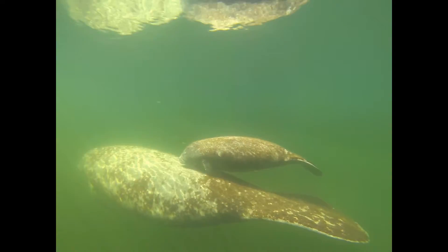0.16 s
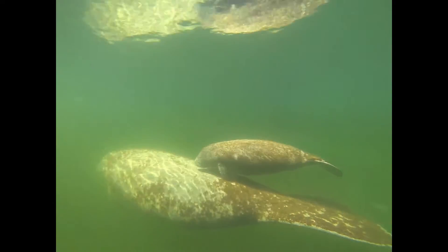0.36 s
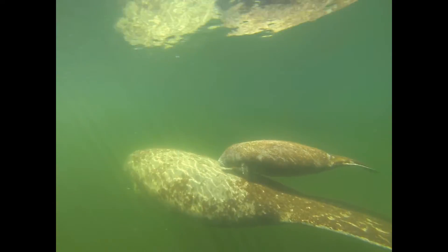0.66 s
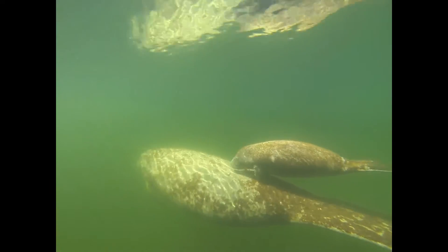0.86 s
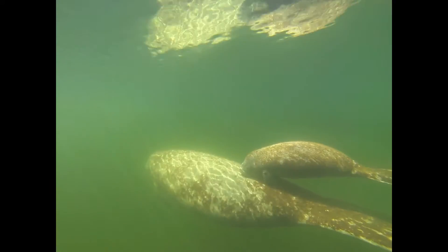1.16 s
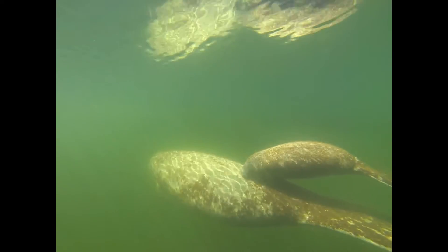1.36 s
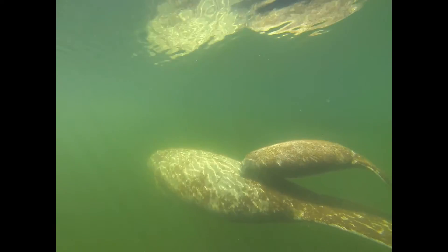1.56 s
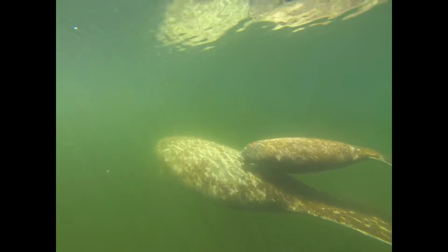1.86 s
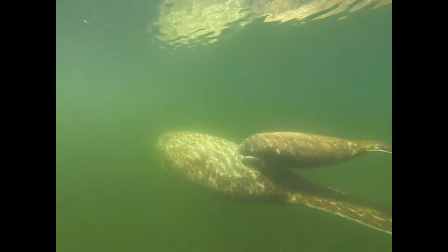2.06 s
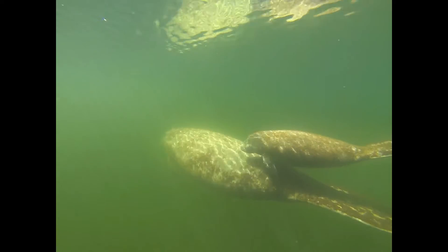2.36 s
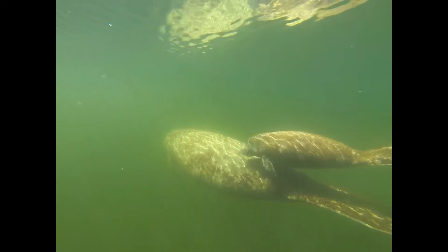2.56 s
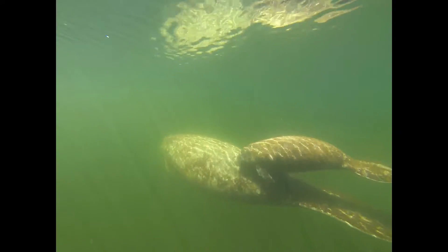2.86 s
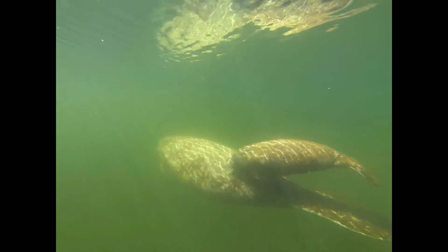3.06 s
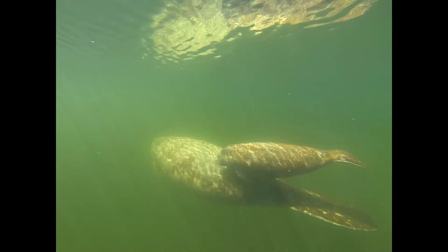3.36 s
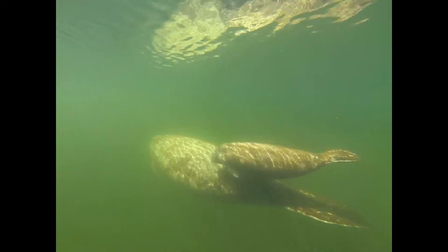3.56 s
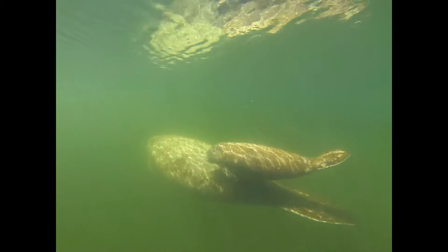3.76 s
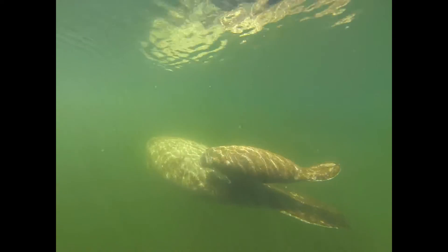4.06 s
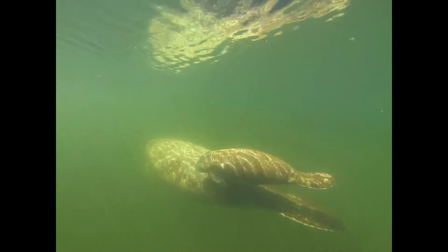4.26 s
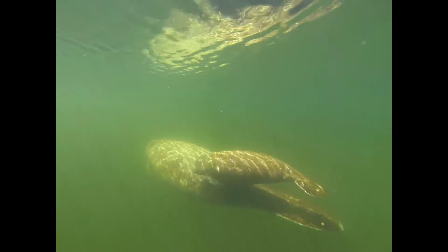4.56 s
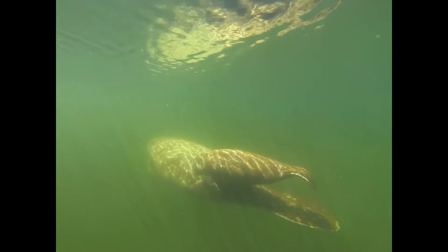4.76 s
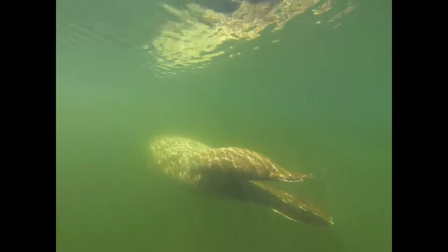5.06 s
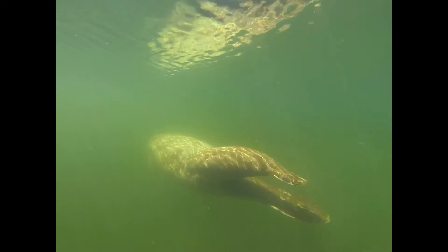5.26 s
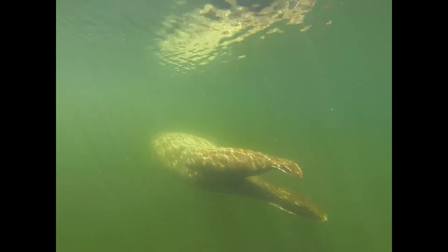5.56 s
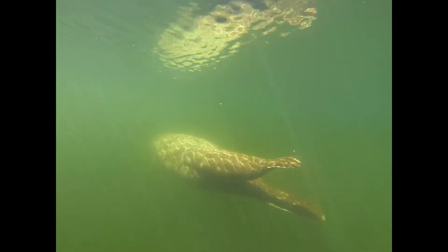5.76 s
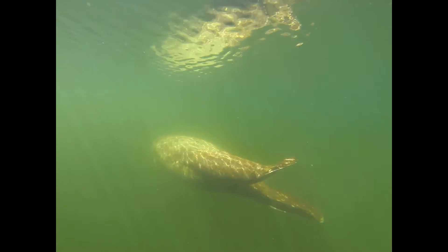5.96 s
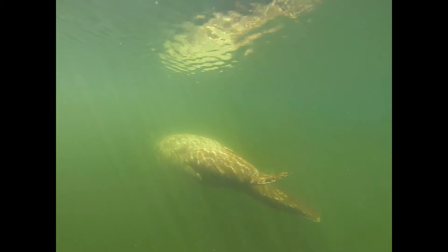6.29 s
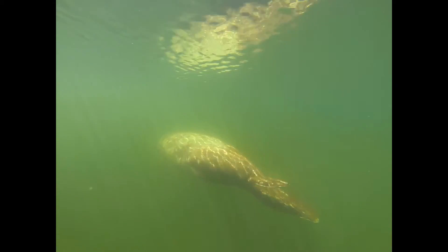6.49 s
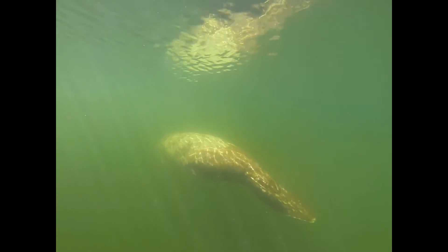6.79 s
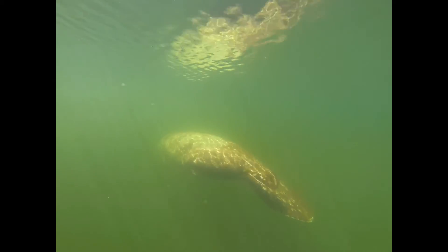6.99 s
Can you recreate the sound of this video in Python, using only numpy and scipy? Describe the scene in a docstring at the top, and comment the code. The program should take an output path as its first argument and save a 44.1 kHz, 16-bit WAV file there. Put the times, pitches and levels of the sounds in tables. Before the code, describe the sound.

A distant boat motor throbs and rumbles low, heard under water by a camera in a sealed housing. Its propeller adds a steady, hollow, ringing hiss, with faint ticks and soft bumps of water. Past the middle, a control on the housing snaps loudly, three clicks almost merged into one, with a tiny scrape. Afterwards the hiss is louder and small ticks crackle more often.

```python
"""A far boat motor throbs low, heard by a camera in a sealed housing under water.
The propeller's collapsing bubbles hiss and make the housing ring. A control on the housing snaps
three times, scrapes and settles, and the hiss is louder after it. Small ticks crackle in the water,
the water softly bumps the housing, and the camera's circuits whine faintly with every picture frame."""
import sys
import numpy as np
from scipy import signal
from scipy.fft import rfft, irfft
from scipy.io import wavfile
from scipy.ndimage import uniform_filter1d

SR = 44100
rng = np.random.default_rng(int(sys.argv[2]) if len(sys.argv) > 2 else 0)


def materialize(psi):
    """Save the field psi as 16-bit PCM at rate SR to the path in sys.argv[1].

    A 1-D psi becomes a single channel; in a 2-D psi each row is a channel.
    """
    bounded = np.clip(np.atleast_2d(psi).T, -1, 1)
    quanta = np.round(bounded * 32767).astype(np.int16)
    wavfile.write(sys.argv[1], SR, quanta)


N = 314433

# The motor's lowest tone. Each row: time in seconds, level in dB, pitch in Hz.
THROB = [(0.0, -26.5, 30.3), (0.2, -30.5, 30.5), (0.32, -32.5, 33.15), (0.83, -30.5, 32.8),
         (1.17, -25, 35.8), (1.39, -36.5, 30.48), (1.61, -25, 30.5), (1.73, -42, 31.8), (1.87, -32.5, 31.6),
         (1.98, -27.5, 27.62), (2.12, -36.5, 27.7), (2.26, -23, 30.33), (2.4, -30, 36.2),
         (2.62, -33.5, 37.2), (2.8, -29.5, 31.45), (3.51, -27, 31.7), (3.57, -44.5, 30.55),
         (3.71, -25, 30.37), (3.87, -39, 30.1), (3.99, -24, 31.36), (4.09, -39, 32.2), (4.19, -32, 34.47),
         (4.59, -30, 34.54), (4.75, -45, 27.6), (4.87, -26, 29.9), (5.2, -27.5, 30.72), (5.3, -36, 32.9),
         (5.66, -28.5, 32.83), (5.78, -32.5, 30.2), (6.33, -37.5, 30.5), (6.49, -32.5, 34.5),
         (7.13, -30.5, 34.2)]
# The rumble around that tone. Each row: time in seconds, level in dB.
RUMBLE_LEVEL = [(0, -26), (.3, -33), (.65, -30.5), (1.4, -36.5), (1.6, -31.5), (1.98, -29), (2.2, -33.5),
                (3.3, -35), (4.2, -36.5), (4.9, -39), (5.05, -34), (6.2, -37), (6.55, -28), (6.75, -36),
                (7.13, -34.5)]
# The rumble's deep and upper bands. Each row: pitch in Hz, width in Hz, relative level in dB.
DEEP_BANDS = [(8, 9.1, -2.5), (18.7, 18, 5), (48.1, 7.2, 5.5), (58.7, 18.5, 2), (71.5, 16, -9),
              (88.5, 15.1, 2.5), (110.3, 8, -8.5)]
UPPER_BANDS = [(142, 56, 1.5), (198, 230, -13)]

def motor():
    """A wavering low tone, wrapped in rumble, fades where its paths through the swell cancel."""
    db, hz = curves(THROB)
    turns = np.cumsum(hz + 1.45 * wander(hz=12)) / SR
    direct, scattered = 0.77, 0.53 * (wander(hz=7.3) + 1j * wander(hz=7.3))
    tone = np.sqrt(2) * amp(db) * ((direct + scattered) * np.exp(2j * np.pi * turns)).real
    deep = resonate(rng.standard_normal(N), DEEP_BANDS)
    upper = resonate(rng.standard_normal(N), UPPER_BANDS)
    lumps = wander(hz=19)
    rumble = amp(1.5 * lumps) * deep + amp(-25 + 2.5 * lumps) * upper
    return tone + amp(curves(RUMBLE_LEVEL)[0]) * rumble


# How loud the propeller hisses. Each row: time in seconds, level in dB.
HISS_LEVEL = [(0, -43), (1.3, -42.5), (2.5, -40.5), (3.1, -42), (4.28, -42.5), (4.4, -39.5), (4.55, -38.5),
              (4.75, -39.5), (5, -37.5), (5.9, -36), (7.13, -35)]
# Where the housing rings. Each row: pitch in Hz, width in Hz, early and late relative level in dB.
HOUSING_RINGS = [(300, 45.5, -19, -13.5), (429, 212, -15.5, -20.5), (442, 24, -12, -10.5),
                 (500, 75, -6.5, -7), (604.5, 76, -1, -0.5), (755, 27, -16, -11), (849, 60, -8.5, -7.5),
                 (1002, 183, -16.5, -16), (1155, 55, -7.5, -11.5), (1257.4, 90, -0.5, -4.5),
                 (1390, 110, 0.5, 0.5), (1478, 93, -6.5, -4), (1588, 58, -13.5, -8), (1635, 160, -8.5, -11),
                 (1814, 350, -15.5, -17), (1962, 237, -12.5, -9.5), (2242, 79, -23, -19.5),
                 (2860, 600, -26.5, -23.5), (3080, 180, -27.5, -18), (3410, 370, -21.5, -19),
                 (3823, 280, -23, -21), (4110, 91, -24, -29), (4640, 1100, -31, -32),
                 (5120, 310, -39, -35.5), (5560, 220, -34, -31.5), (6270, 430, -30, -34.5),
                 (7150, 810, -40, -48), (8520, 1400, -39, -45), (9800, 990, -54, -64)]
# Narrow gaps between those rings. Each row: pitch in Hz, width in Hz, depth in dB.
HOUSING_GAPS = [(549, 16, 5.5), (787, 20, 4.5), (1222, 21, 5), (1430, 18, 3), (2470, 170, 2.5),
                (3730, 30, 6.5), (4230, 130, 5.5)]

def propeller_hiss(shift_s=4.55, shift_takes_s=0.32):
    """Collapsing bubbles ring the housing; the tone colour shifts as the control moves."""
    moved = np.clip((np.arange(N) / SR - shift_s) / shift_takes_s, 0, 1)
    late_share = 0.08 + 0.81 * moved
    bubbles = rng.standard_normal(N) * amp(1.22 * wander(hz=59.4) + 0.56 * late_share * wander(hz=300))
    early = resonate(bubbles, [(hz, width, db) for hz, width, db, _ in HOUSING_RINGS], HOUSING_GAPS)
    late = resonate(bubbles, [(hz, width, db) for hz, width, _, db in HOUSING_RINGS], HOUSING_GAPS)
    return amp(curves(HISS_LEVEL)[0]) * ((1 - late_share) * early + late_share * late)


# The notes of the control's latch. Each row: pitch in Hz, relative level in dB, seconds to fade 60 dB.
LATCH_RINGS = [(300, -6.5, 0.064), (480, -1.5, 0.048), (636, 1, 0.081), (870, -2, 0.15), (1214, 3, 0.077),
               (1309, 3.5, 0.082), (1418, 1.5, .06), (1581, 3, 0.029), (1762, -2, 0.033), (1992, -3, 0.028),
               (2720, -31, 0.058), (2990, -4.5, 0.027), (3410, 0, 0.022), (3980, -2, 0.016),
               (4530, -12, 0.032), (4930, -0.5, 0.045), (5420, -4.5, 0.037), (6380, 1.5, 0.026),
               (6800, -2.5, 0.039), (7450, -13.5, 0.028), (8660, -9, 0.017), (8970, -20, 0.019),
               (11000, -31, 0.017), (12500, -42, .02), (14000, -47, .015)]
# Five pitches in Hz, low to high, at which a snap's tone colour is set.
COLOUR_HZ = [704, 1296, 1890, 3300, 5650]

def latch_snap(colour_db, contact_s):
    """One short blow rings the latch's notes in a spray of rattle."""
    t = np.arange(4000) / SR
    notes = [(hz, db + np.interp(np.log(hz), np.log(COLOUR_HZ), colour_db), fade_s)
             for hz, db, fade_s in LATCH_RINGS]
    rings = sum((-1) ** k * amp(db - 60 * t / fade_s) * np.sin(2 * np.pi * hz * t)
                for k, (hz, db, fade_s) in enumerate(notes))
    rattle = resonate(rng.standard_normal(len(t)), [(hz, 0.33 * hz, db) for hz, db, _ in notes])
    blow = 1 + 1.9 * np.exp(-(t / contact_s) ** 2)  # loudest while the parts still touch
    sound = unit_level(rings) * blow + amp(7.5 - 60 * t / 0.056) * rattle
    sound *= np.sin(np.pi / 2 * np.minimum(t / 0.0011, 1)) ** 2  # quick fade in
    return sound / abs(sound).max()


def latch_scrape(slide_s=4.655, rub_s=4.677, hold_s=0.013, fall_db_per_s=1000):
    """A light slide, then a harder rub, rings the same latch notes with gritty noise."""
    t = np.arange(N) / SR
    force = np.clip((t - slide_s) / 0.0087, 0, 1) * amp(np.where(t < rub_s, -31.5, -24.5))
    force *= amp(-fall_db_per_s * np.maximum(t - rub_s - hold_s, 0))
    grit = rng.standard_normal(N) * amp(3.4 * wander(hz=300))
    bands = [(hz, 14 / fade_s, db - 0.45 * hz / 1000) for hz, db, fade_s in LATCH_RINGS]
    return uniform_filter1d(force, size=150) * resonate(grit, bands)


# Snaps and rebounds. Each row: start in seconds, peak in dB, five boosts or cuts in dB
# (one for each pitch in COLOUR_HZ), contact time in seconds.
SNAPS = [(4.576, -3, -22.5, -12.5, -3.5, -7, -22, 0.0021), (4.587, -14, -30, -9, 0, -16, -35, 0.0021),
         (4.605, 0.5, -19, -17, -5, -3, -15, 0.0025), (4.616, -10.5, -16, -6.5, 4, -4, -28, 0.0027),
         (4.635, -1.5, -28, -2, -5, 0, -8.5, 0.0041), (4.645, -16.5, -21, -15, -1, -12, -31, 0.0022),
         (4.65, -19.5, -11, 3, -16, -6, -23, 0.0015), (4.684, -15.5, -4, -4, -26, -23, -24, 0.0015),
         (4.736, -22.5, -33, -9.5, -9, -10.5, -33, 0.0022)]
# Thuds in the housing wall. Each row: start in seconds, peak in dB, pitch in Hz, rise in seconds.
WALL_THUDS = [(4.668, -25.5, 300, 0.0055), (4.677, -33, 500, 0.0067), (4.688, -23, 585, 0.0045),
              (4.703, -35, 352, 0.0027)]

def control():
    """The control snaps, rebounds and scrapes, and the housing wall gives under it."""
    out = np.zeros(N)
    for start, db, *colour_db, contact_s in SNAPS:
        add(out, start, amp(db) * latch_snap(colour_db, contact_s))
    for start, db, hz, rise_s in WALL_THUDS:
        add(out, start, amp(db) * soft_push(hz, rise_s, sink=0.052))
    return out + latch_scrape()


# Clear ticks and duller pops in the water. Each row: start in seconds, peak in dB, pitch in Hz.
TICKS = [(0.5215, -43, 6050), (0.7347, -50, 6350), (0.7651, -44, 6840), (0.8869, -44, 5420),
         (1.4386, -49, 6450), (1.4687, -45, 6350), (2.4404, -47.5, 5490), (2.529, -45, 6830),
         (2.7994, -50, 6330), (2.952, -46, 6335), (3.0751, -45.5, 5400), (3.595, -48, 6340),
         (4.8908, -38, 6010), (4.9851, -47, 6360), (5.009, -42, 5500), (5.0946, -40.5, 6135),
         (5.2053, -47, 6250), (5.5313, -49, 5640), (5.8565, -34, 5220), (6.0596, -43, 6110),
         (6.113, -42.5, 5470), (6.5413, -40.5, 5446), (7.055, -49, 5640)]
POPS = [(5.0948, -36, 3700), (5.4405, -35, 3410), (5.647, -37, 3440), (5.8531, -37, 3340),
        (6.0586, -37, 3360), (6.161, -40, 3390), (6.2627, -39, 3080), (6.4672, -36.5, 3476),
        (6.5665, -39.5, 2890), (6.6707, -35, 3290), (7.0742, -39, 3904)]
# Soft rustles as the control settles. Each row: start in seconds, peak in dB.
RUSTLES = [(4.768, -36), (4.813, -36), (4.844, -38.5)]

def crackle(patter_per_s=6):
    """Ticks, pops, rustles and a thin patter that grows with the hiss; their treble is dulled above about 9
    kHz."""
    out = np.zeros(N)
    for start, db, hz in TICKS:
        add(out, start, amp(db) * tick(hz, sharpness=2.8, fade_s=0.019))
    for start, db, hz in POPS:
        add(out, start, amp(db) * tick(hz, sharpness=4.4, fade_s=0.033))
    for start, db in RUSTLES:
        add(out, start, amp(db) * tick(hz=4440, sharpness=1.26, fade_s=0.097))
    hiss_rise_db = curves(HISS_LEVEL)[0] + 40
    for hz in (3050, 3400, 3800, 5500, 6060, 6300, 6560):  # each pitch has its own patter
        hits = rng.random(N) < patter_per_s / SR
        strengths = amp(3 * np.minimum(rng.exponential(1, N), 3))
        db, fade_s = (-57 + 1.6 * hiss_rise_db, 0.03) if hz < 4000 else (-59 + 0.5 * hiss_rise_db, 0.015)
        out += amp(db) * signal.oaconvolve(hits * strengths, tick(hz, 4.7, fade_s))[:N]
    return signal.sosfilt(signal.butter(6, 9200, fs=SR, output="sos"), out)


# Water bumping the housing. Each row: start in seconds, peak in dB.
BUMPS = [(1.237, -46), (1.418, -46), (1.759, -41.5), (1.96, -39.5), (4.162, -49), (5.039, -49),
         (5.939, -43), (6.519, -39)]

def water_bumps():
    """Water nudges the housing with soft, low knocks."""
    out = np.zeros(N)
    for start, db in BUMPS:
        add(out, start, amp(db) * soft_push(hz=141, rise_s=0.0082, sink=0.21))
    return out


# The whine through one picture frame. Each row: place in the frame from 0 to 1, pitch in Hz, level in dB.
FRAME_WHINE = [(0, 5120, -82), (.09, 5150, -58.5), (.13, 5150, -57.5), (.22, 5234, -70.5), (.33, 5150, -65),
               (.47, 5004, -67), (.56, 5120, -72), (.7, 5214, -63), (.8, 5195, -70), (1, 5200, -76)]

def circuits(frames_per_s=47.952):
    """The circuits whine, chirp and buzz in step with the picture frames, over a steady hiss."""
    frames = np.arange(N) * frames_per_s / SR
    place = frames % 1
    high_frame = frames.astype(int) % 15 == 8  # one frame in 15 holds a higher note, with no chirp
    places, hz, db = np.transpose(FRAME_WHINE)
    pitch = np.where(high_frame, 5570, np.interp(place, places, hz)) + 75 * wander(hz=252)
    level = amp(np.where(high_frame, -70, np.interp(place, places, db)))
    turns = np.cumsum(uniform_filter1d(pitch, size=100)) / SR
    whine = np.sqrt(2) * uniform_filter1d(level, size=100) * np.sin(2 * np.pi * turns)
    frame_edges = np.exp(-((place - 0.07) / 0.079) ** 2) + 0.5 * np.exp(-((place - 0.93) / 0.03) ** 2)
    chirp = resonate(rng.standard_normal(N), [(7900, 500, -5), (8500, 600, 3), (9300, 600, 1)])
    chirp *= frame_edges * ~high_frame
    hiss = resonate(rng.standard_normal(N), [(8930, 2900, -1), (13900, 4900, -5)])
    frame_pulses = np.diff(frames // 1, prepend=0)
    buzz = resonate(frame_pulses, [(2490, 130, 0), (7360, 130, 0.5)])
    return whine + amp(-66.5) * chirp + amp(-78) * buzz + amp(-73.5) * hiss


def tick(hz, sharpness, fade_s):
    """A short burst of noise around one pitch; more sharpness makes the pitch clearer."""
    t = np.arange(2000) / SR
    burst = rng.standard_normal(len(t)) * amp(-60 * t / fade_s) * np.minimum(t / 0.00083, 1)
    band = signal.iirpeak(hz, sharpness, SR)
    ring = signal.lfilter(*band, signal.lfilter(*band, burst))
    return ring / abs(ring).max()


def soft_push(hz, rise_s, sink):
    """A brief tone that swells and fades while its pitch sinks from above hz to below it."""
    t = np.arange(5000) / SR
    pitch = hz * (1 - sink + 2 * sink * np.exp(-t / (2 * rise_s)))
    swell = t / rise_s * np.exp(1 - t / rise_s)
    return swell * np.sin(2 * np.pi * np.cumsum(pitch) / SR)


def resonate(x, bands, gaps=()):
    """Keeps the bands of x and cuts the gaps, each given as (pitch in Hz, width in Hz, dB)."""
    f = np.fft.rfftfreq(len(x), 1 / SR)
    power = sum(amp(db) ** 2 / (1 + (2 * (f - hz) / width) ** 2) ** 2 for hz, width, db in bands)
    cut_db = sum(db / (1 + (2 * (f - hz) / width) ** 2) for hz, width, db in gaps)
    return unit_level(irfft(rfft(x) * np.sqrt(power) / amp(cut_db), len(x)))


def wander(hz):
    """A smooth random wobble of about size 1; a higher hz makes it quicker."""
    keep = np.exp(-2 * np.pi * hz / SR)
    return unit_level(signal.lfilter([1], [1, -2 * keep, keep ** 2], rng.standard_normal(N)))


def amp(db):
    """Turns dB into a number to multiply by."""
    return 10 ** (np.asarray(db) / 20)


def unit_level(x):
    """Scales x to an average power of 1."""
    return x / np.sqrt(np.mean(x ** 2) + 1e-20)


def curves(rows):
    """Joins a table's points in time with straight lines, one curve for each value column."""
    times, *columns = np.transpose(rows)
    return [np.interp(np.arange(N) / SR, times, column) for column in columns]


def add(mix, start_s, sound):
    """Mixes a sound in at its start time."""
    part = mix[round(start_s * SR):][:len(sound)]
    part += sound[:len(part)]


def scene():
    """All the sources together in one channel."""
    return (motor() + water_bumps() + propeller_hiss() + control() + crackle() + circuits())[None]


def record(dry):
    """The camera turns itself down briefly after loud snaps, rounds off peaks and dulls the treble."""
    power_db = 10 * np.log10(abs(uniform_filter1d(dry[0] ** 2, 200)) + 1e-12)
    fall_db = 60 * np.arange(N) / SR
    peak_db = np.maximum.accumulate(power_db + fall_db) - fall_db  # holds each peak, then lets it sink
    excess_db = np.maximum(peak_db + 5.5, 0)
    late_db = signal.lfilter(np.ones(150) / 150, [1], excess_db)  # acts a few milliseconds late
    ducked = dry / amp(0.5 * late_db)
    rounded = ducked / (1 + ducked ** 6) ** (1 / 6)
    dulled = signal.sosfilt(signal.butter(3, 10500, fs=SR, output="sos"), rounded)
    treble_cut = signal.firwin(511, 15300, window=("kaiser", 9), fs=SR)
    return signal.oaconvolve(dulled, treble_cut[None], "same")


dry = scene()
out = record(dry)
materialize(out)
```